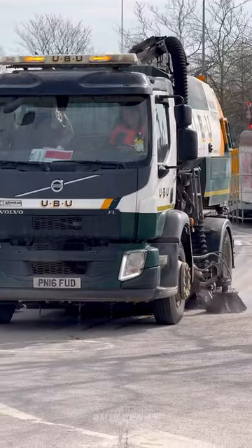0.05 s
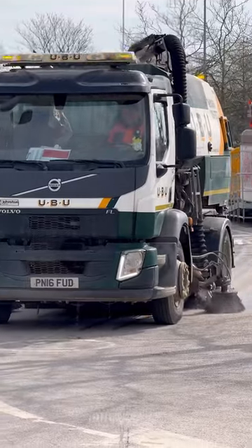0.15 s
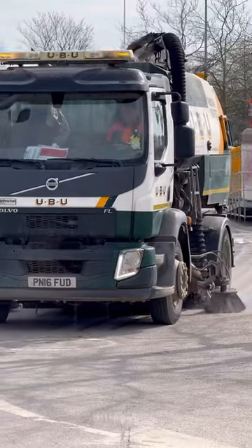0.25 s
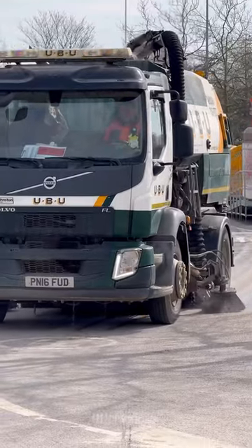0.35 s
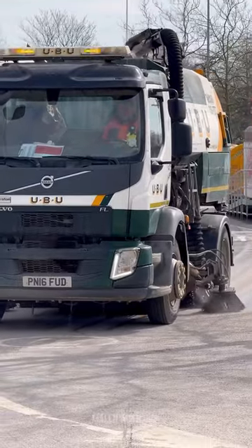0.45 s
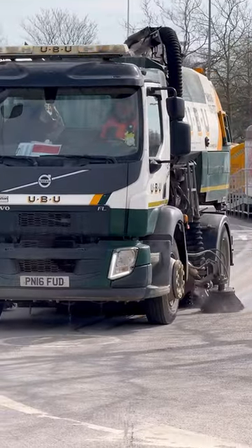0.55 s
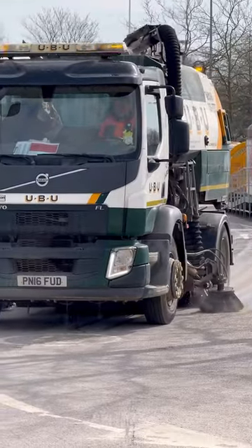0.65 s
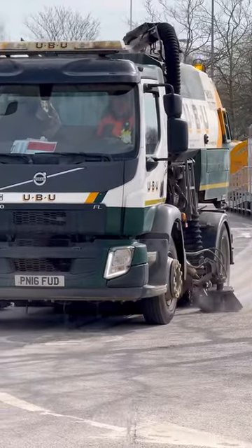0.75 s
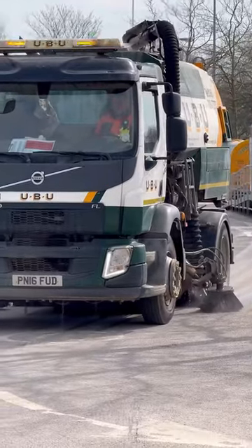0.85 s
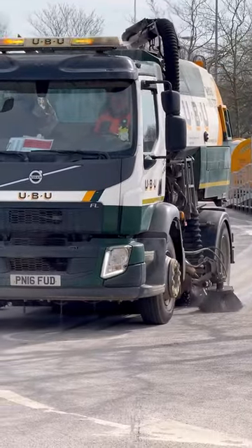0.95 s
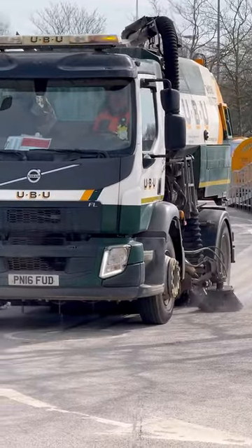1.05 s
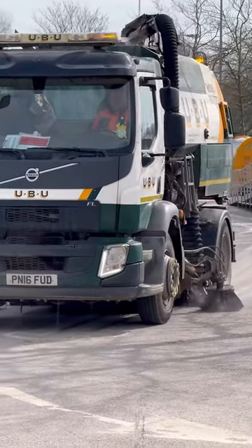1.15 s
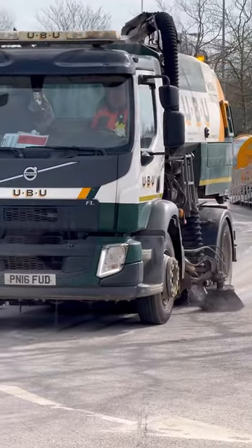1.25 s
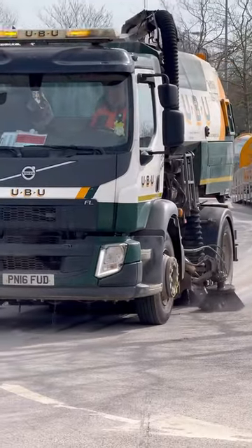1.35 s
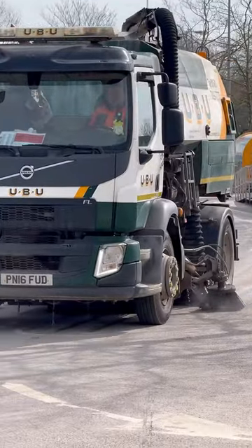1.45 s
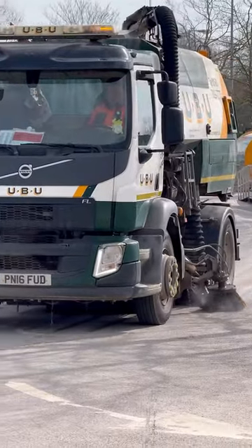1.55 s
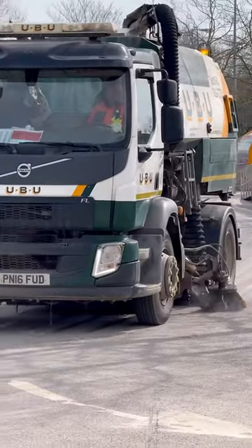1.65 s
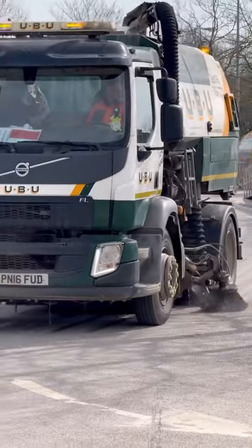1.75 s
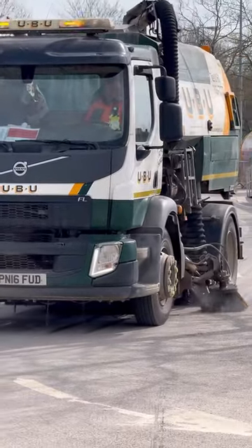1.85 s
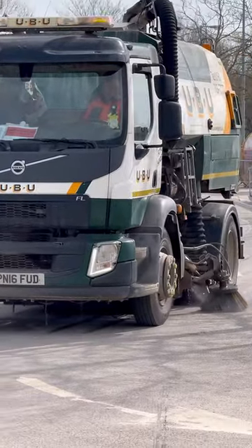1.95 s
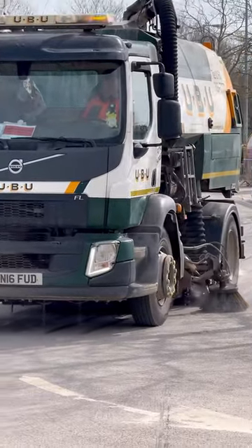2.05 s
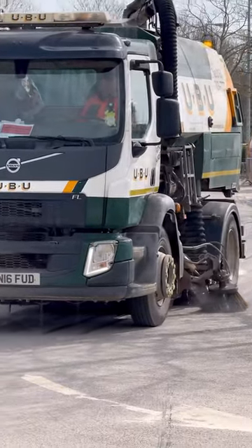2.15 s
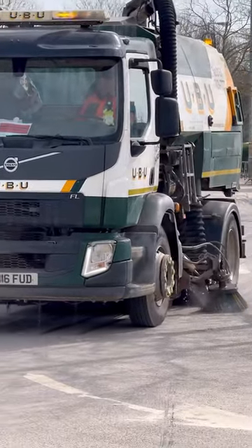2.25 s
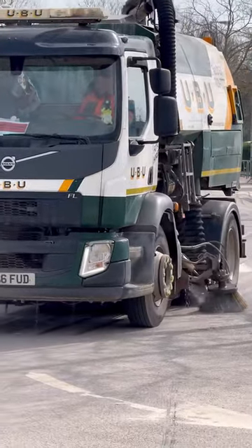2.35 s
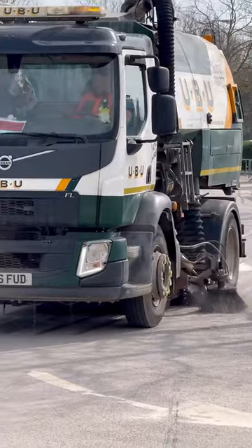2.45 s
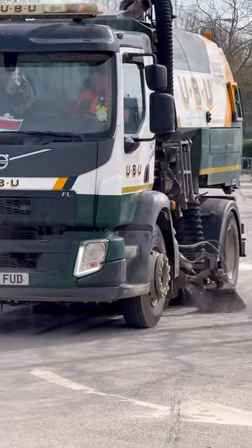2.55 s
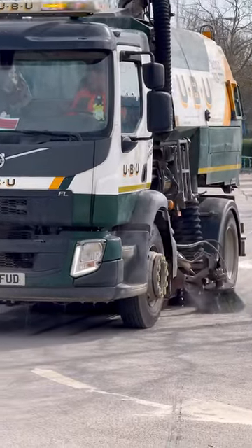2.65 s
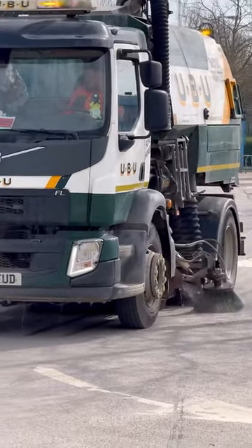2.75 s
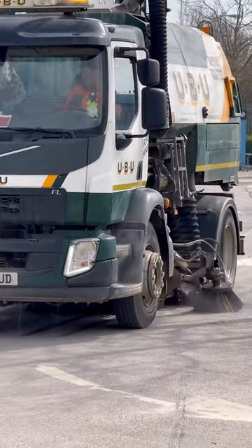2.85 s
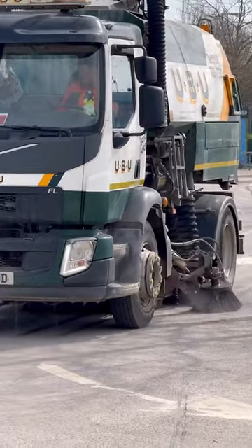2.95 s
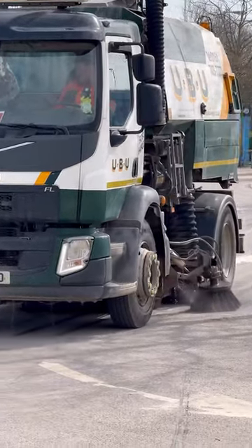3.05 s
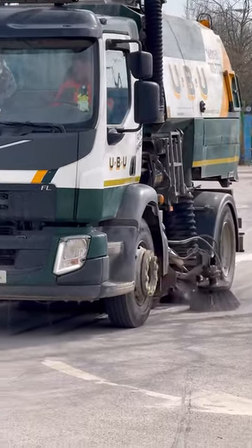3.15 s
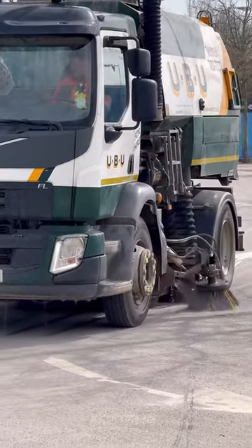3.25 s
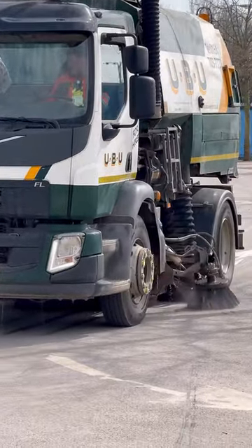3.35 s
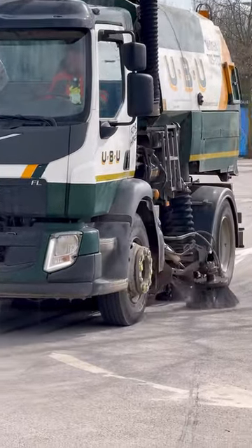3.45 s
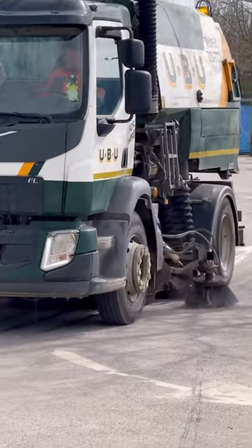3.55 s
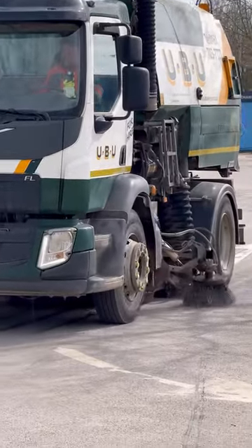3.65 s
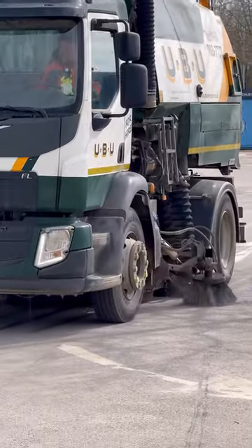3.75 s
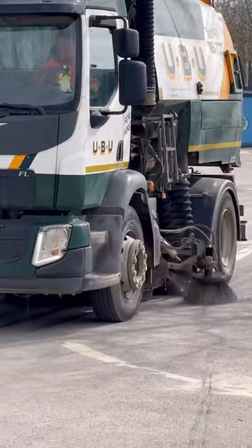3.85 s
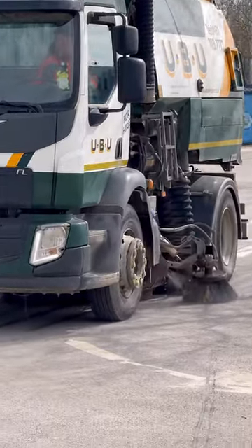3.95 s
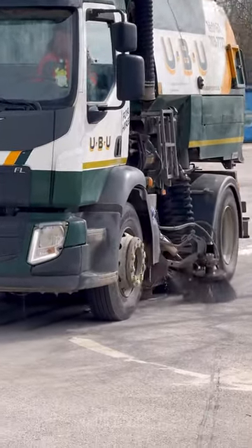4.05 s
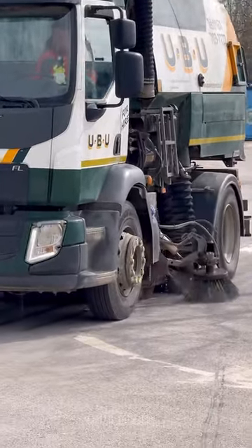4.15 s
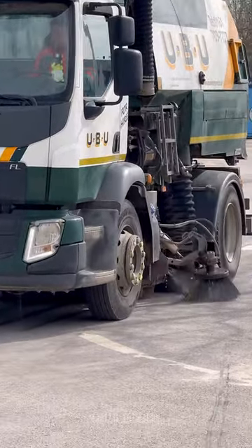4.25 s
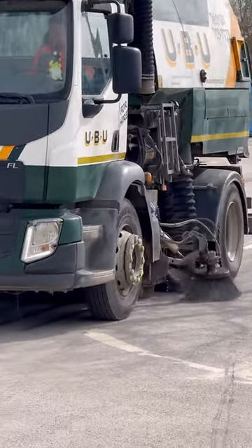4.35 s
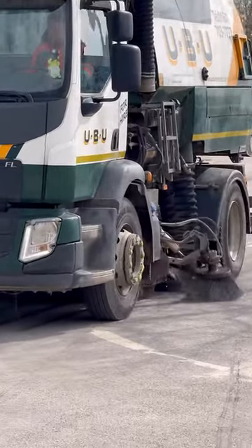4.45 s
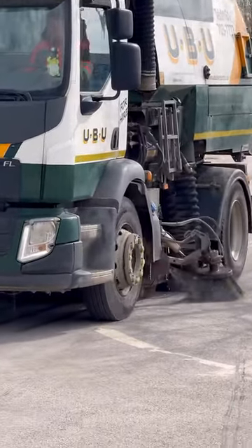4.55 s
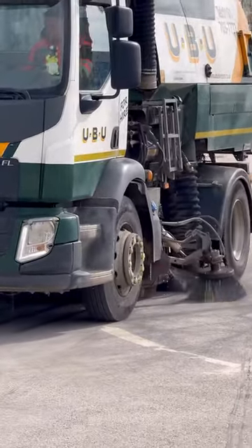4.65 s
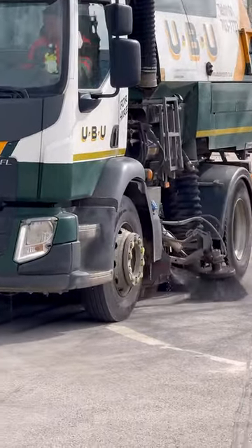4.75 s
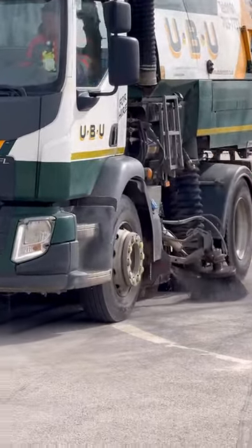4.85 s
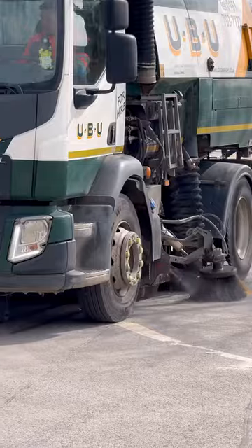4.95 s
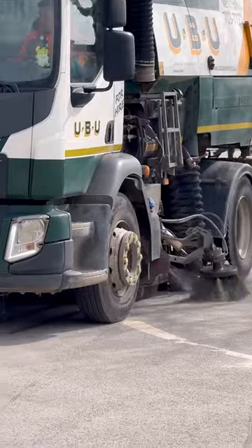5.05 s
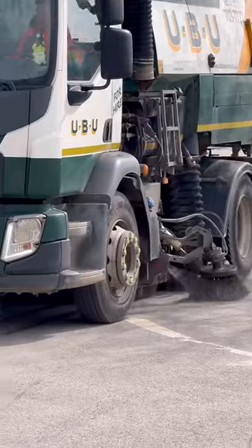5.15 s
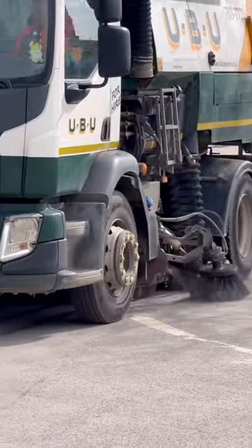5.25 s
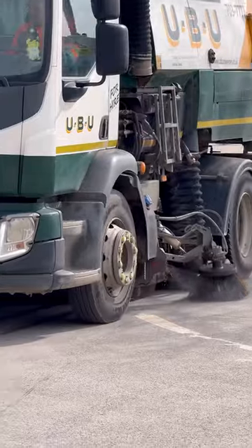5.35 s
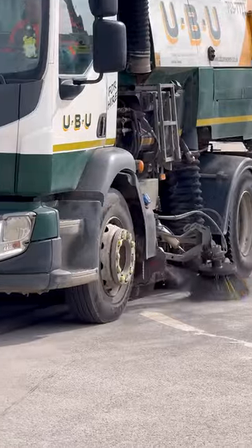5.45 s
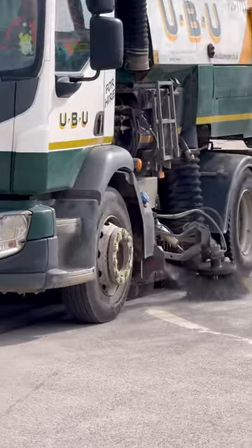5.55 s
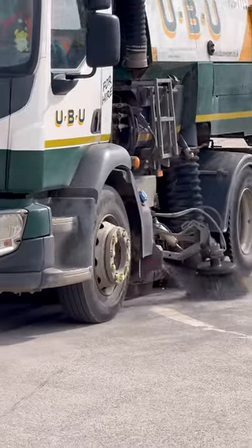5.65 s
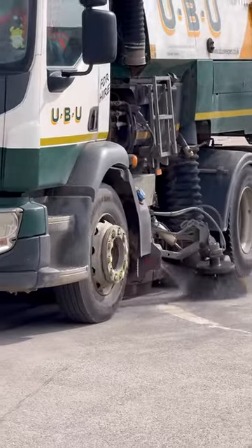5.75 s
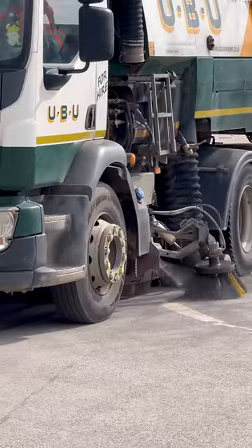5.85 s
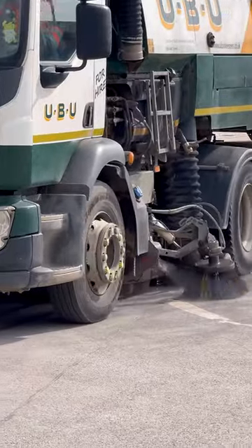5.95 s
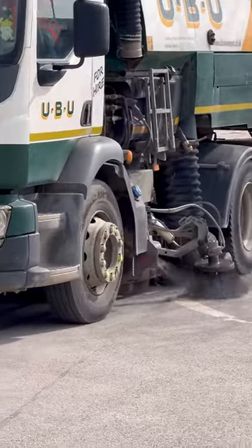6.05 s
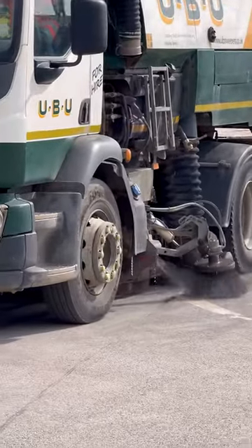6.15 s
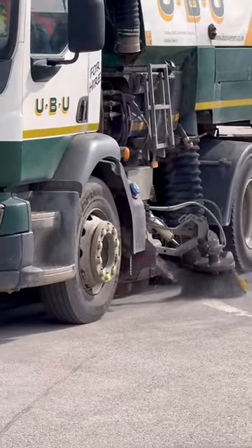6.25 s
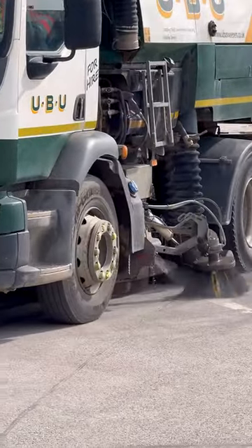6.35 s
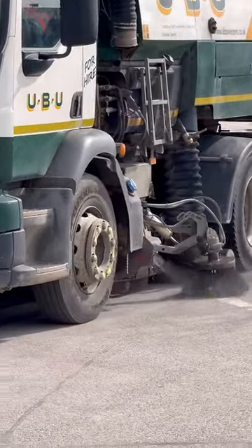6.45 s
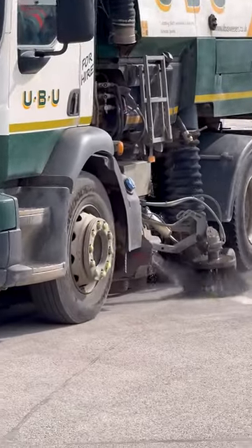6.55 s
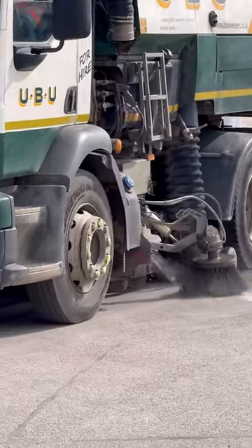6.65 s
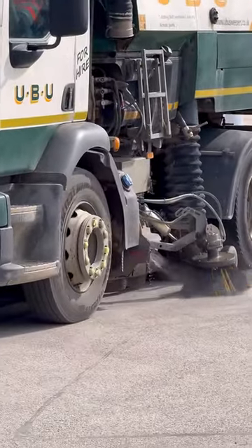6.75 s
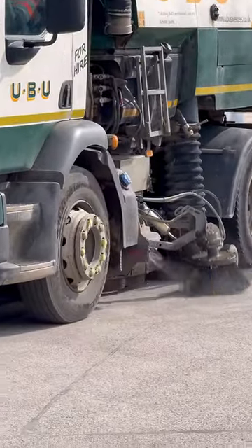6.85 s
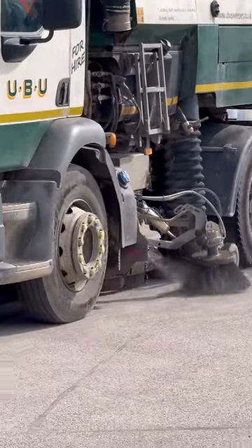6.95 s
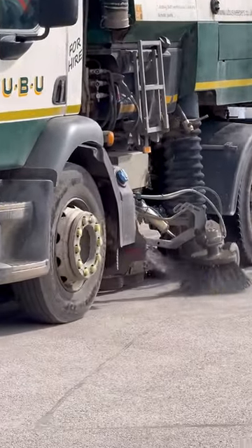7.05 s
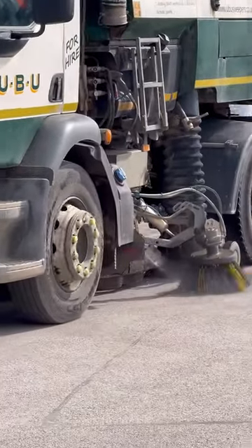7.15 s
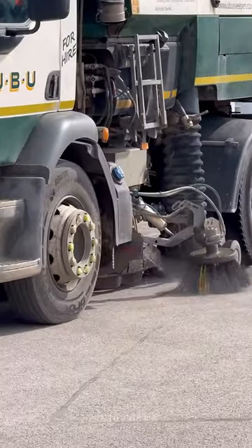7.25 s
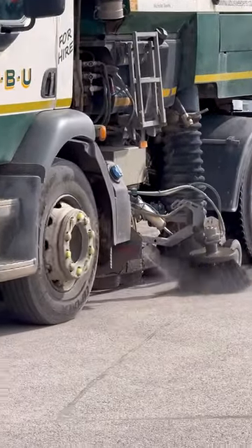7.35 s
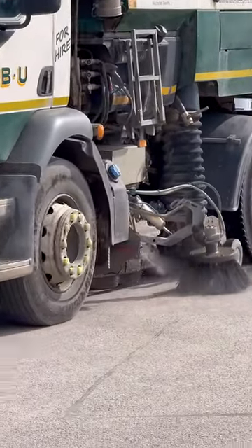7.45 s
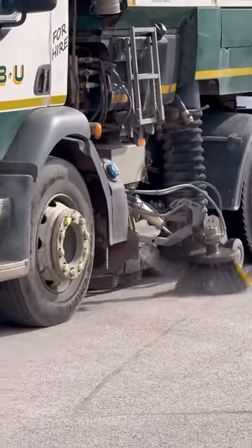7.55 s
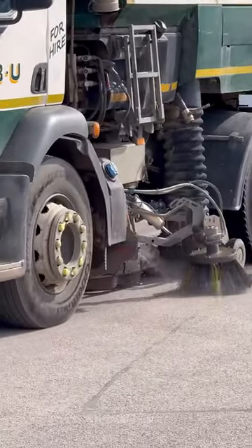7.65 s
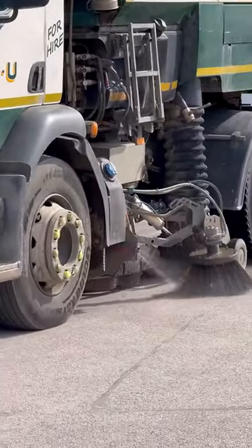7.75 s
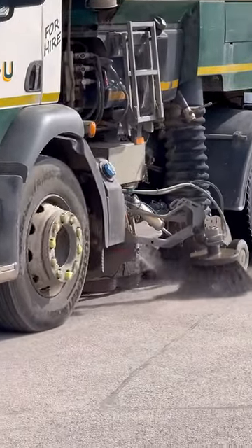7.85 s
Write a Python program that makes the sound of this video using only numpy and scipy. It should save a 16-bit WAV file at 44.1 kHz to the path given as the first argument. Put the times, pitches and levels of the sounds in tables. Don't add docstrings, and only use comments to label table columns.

```python
import sys
import numpy as np
from scipy import signal
from scipy.fft import rfft, irfft, next_fast_len
from scipy.io import wavfile
from scipy.ndimage import uniform_filter1d, map_coordinates

SR = 44100
rng = np.random.default_rng(int(sys.argv[2]) if len(sys.argv) > 2 else 0)


def convert_level_to_amplitude(level_db):
    exponent = np.asarray(level_db, float) / 20
    return 10 ** exponent


def store_wav(level_fs):
    pcm = np.round(np.clip(np.atleast_2d(level_fs), -1, 1) * 32767)
    wavfile.write(sys.argv[1], SR, pcm.T.astype(np.int16))


N = 347949
T_S = np.arange(N) / SR


def unit(x):
    return x / np.sqrt(np.mean(x ** 2) + 1e-20)


def along(points, hz):
    f, v = np.transpose(points)
    return np.interp(np.log(hz + 1), np.log(f + 1), v)


def curve(points):
    s, v = np.transpose(points)
    return np.interp(T_S, s, v)


def swells(rows):
    s = np.arange(0, N / SR + 1, 1 / 500)
    db = sum(db * np.exp(-((s - at_s) / half_s) ** 2) for at_s, db, half_s in rows)
    return np.interp(T_S, s, db)


def wobble(rate_hz):
    s = np.arange(0, N / SR + 1, 1 / 500)
    knots = rng.standard_normal(int(s[-1] * rate_hz) + 4)
    return np.interp(T_S, s, map_coordinates(knots, [s * rate_hz]))


def filtered(x, response):
    m = next_fast_len(N + 8192)
    return irfft(rfft(x, m) * response(np.fft.rfftfreq(m, 1 / SR)), m)[..., :N]


def rush(spectrum, patchy_db, grit=0):
    z = signal.stft(rng.standard_normal(N), nperseg=512)[2]
    field = uniform_filter1d(rng.standard_normal(z.shape), size=6, axis=0)
    field = uniform_filter1d(field, size=12, axis=1)
    patchy = signal.istft(z * convert_level_to_amplitude(patchy_db * unit(field)), nperseg=512)[1][:N]
    grains = rng.laplace(size=N) * (rng.random(N) < .02)

    def colour(hz):
        inside = (hz > spectrum[0][0]) & (hz < 16000)
        return convert_level_to_amplitude(along(spectrum, hz)) * inside

    return unit(filtered(unit(patchy) + grit * unit(grains), colour))


def tone(turns, db, sway_db, drift_rad):
    phase = 2 * np.pi * (turns + rng.random()) + drift_rad * wobble(2.995)
    return np.sqrt(2) * convert_level_to_amplitude(db + sway_db * wobble(4)) * np.sin(phase)


# t/s, level/dB
PASS = [(0.0, -34.5), (0.79, -35), (1.16, -37), (1.78, -34), (3.45, -32.5), (3.84, -31), (4.44, -32.5),
        (4.88, -31), (6.5, -31.5), (6.81, -32.5), (7.69, -29.5), (7.89, -31)]


def nearness():
    db = curve(PASS)
    return db - db.mean()


def exposed():
    return np.maximum(T_S - 5.82, 0)


# t/s, level/dB
FAN = [(0, -23), (.27, -21), (.7, -25), (1.05, -28), (1.45, -24), (1.85, -28.5), (2.15, -17.5),
       (2.45, -24.5), (2.85, -19), (3.35, -22), (4.6, -21), (5.0, -22), (5.25, -17), (6.0, -16),
       (6.25, -15), (6.5, -20.5), (6.85, -17), (7.65, -16.5), (7.89, -24)]
# t/s, level/dB, half width/s
FADES = [(1.2, -20, .04), (1.28, -8, .03), (1.68, -9, .04), (1.76, -3, .03), (2.55, -6, 0.031),
         (3.1, -13, 0.068), (3.86, -5, 0.032), (4.03, -6, .05), (4.38, -3.5, 0.11), (4.69, -2, 0.026),
         (5.55, -12, 0.065), (5.65, -6, 0.046), (6.35, -6.5, 0.078), (7.1, -13, 0.1), (7.42, -3.5, 0.061),
         (7.8, -9, 0.025)]
# t/s, level/dB, half width/s
GLINTS = [
    (6.43, 6, .09),
    (6.71, 5, 0.073),
    (6.87, -13, 0.055),
    (7.1, 2, .06),
    (7.22, -7, .03),
    (7.34, 4, .07),
    (7.66, -6, .04),
]


def fan_blades():
    blade_hz = 351.8 + 0.37 * wobble(4)
    turns = np.cumsum(blade_hz) / SR
    eddies_db = 1.16 * wobble(40)
    howl_db = curve(FAN) + swells(FADES) + eddies_db
    octave_db = -46 + 8.5 * exposed() + swells(GLINTS)
    howl = tone(turns, howl_db, sway_db=0.07, drift_rad=0.1)
    return howl + tone(2 * turns, octave_db, sway_db=1.2, drift_rad=0.24)


# t/s, level/dB, half width/s
THROBS = [(.42, 3, .05), (.62, 12, .06), (1.02, 10, .07), (1.43, 7, .08), (1.91, 7, .07), (2.42, 8, .07),
          (3.06, 4, .06), (3.32, 8, .05), (4.23, 10, 0.046), (4.6, 3, 0.26), (5.06, 13, .06),
          (5.65, 17, .06), (6.04, 4, .05), (6.57, 13, .08), (7.0, 1, .08), (7.37, 11, 0.13),
          (7.74, 10, .06)]
# f/Hz, level/dB per Hz
RUMBLE = [(18, -34), (28, -28), (38, -20), (48, -8), (62, 0), (81, 0), (120, -3.5), (150, -6.5),
          (200, -41.5)]
BODY = [(90, -38), (130, -3.5), (165, -1.5), (200, 0.5), (300, -7), (370, -2.5), (430, -5.5), (500, -4.5),
        (560, -6.5), (620, -15.5), (800, -37)]
ROAR = [(400, -24), (600, -1.5), (800, -1), (920, -3), (1200, -1), (1400, -4), (2000, -5.5), (2350, -9.5),
        (2800, -10.5), (3600, -47)]


def fan_air():
    near_db = nearness()
    rumble_db = -29 + 0.2 * near_db + 0.29 * swells(THROBS) + 1.2 * wobble(7)
    body_db = -27 + 0.52 * near_db + 0.75 * wobble(7)
    roar_db = -28 + 0.74 * near_db + 0.21 * wobble(8)
    rumble = convert_level_to_amplitude(rumble_db) * rush(RUMBLE, patchy_db=0.5)
    body = convert_level_to_amplitude(body_db) * rush(BODY, patchy_db=0.5)
    return rumble + body + convert_level_to_amplitude(roar_db) * rush(ROAR, patchy_db=0.39)


# order of its working cycle, level/dB
REAR = [(11, -44), (12, -43), (15, -39), (16, -42), (17, -47.5), (20, -42.5), (22, -44.5), (23, -44)]
# t/s, level/dB, half width/s
EIGHTHS = [(.4, 4, 0.23), (1.47, 6, .08), (1.95, 4, 0.32), (4.0, 7, 0.22), (4.75, 6, .2), (5.45, 7, 0.38),
           (6.31, 6, 0.062), (6.9, -1, .2), (7.65, 2, .2)]
FOURTHS = [(.18, 5, .08), (1.81, 8, .07), (2.5, 5, .2), (2.97, 10, .08), (3.42, 9, 0.17), (4.07, 14, .12),
           (4.8, 10, .12), (5.8, 10, .08), (6.7, 10, .3), (7.55, 7, .2)]
# order of its firing rate, level/dB
FRONT = [(3, -43.5), (4, -42), (11, -41.5), (28, -49.5)]
# f/Hz, level/dB
WHINES = [(43.9, -48), (92.9, -41), (109.9, -43), (414.9, -56.5), (1349, -57), (1670.5, -53.5),
          (2022.4, -50.5)]


def engines():
    cycles = 12.97 * T_S
    firings = 35.8 * T_S
    out = tone(8 * cycles, -35 + swells(EIGHTHS), sway_db=0.6, drift_rad=0.2)
    out += tone(4 * cycles, -40.5 + swells(FOURTHS), sway_db=0.6, drift_rad=0.2)
    out += sum(tone(k * cycles, db, sway_db=2.5, drift_rad=0.53) for k, db in REAR)
    out += sum(tone(k * firings, db, sway_db=0.0, drift_rad=0.72) for k, db in FRONT)
    out += tone(2.04 * firings, -38 + swells(THROBS), sway_db=1.5, drift_rad=0.8)
    return out + sum(tone(hz * T_S, db, sway_db=2.5, drift_rad=0.6) for hz, db in WHINES)


# t/s, level/dB, half width/s
LOADS = [(.95, 12, .12), (1.8, 10, .12), (2.7, 13, .2), (3.1, 8, .12), (3.55, 12, .15), (4.25, 12.5, .3),
         (4.8, 8, 0.17), (5.45, 13, .25), (6.2, 7, .25), (6.95, 8, .1)]


def pump():
    piston_hz, gear_hz = 328.9, 699.3
    pistons = tone(piston_hz * T_S, -41.5 + 1.8 * nearness(), sway_db=5.0, drift_rad=0.26)
    octave = tone(2 * piston_hz * T_S, -49.5 + swells(LOADS), sway_db=1.5, drift_rad=0.3)
    gear = tone(gear_hz * T_S, -44 + 1.0 * exposed(), sway_db=2.5, drift_rad=0.31)
    return pistons + octave + gear


# t/s, level/dB
GRIT = [(0.0, -44), (0.46, -48), (0.7, -46.5), (1.03, -49.5), (1.54, -45), (3.1, -41.5), (3.58, -43.5),
        (3.65, -41), (4.46, -45), (4.85, -42), (5.07, -43.5), (5.36, -40), (5.45, -43), (6.0, -41.5),
        (6.61, -45), (7.45, -42), (7.54, -41), (7.89, -41.5)]
# t/s, level/dB
NEAR = [(0, -0.5), (2, -2.5), (4, -1), (6, 1), (7.89, 0.5)]
# f/Hz, level/dB per Hz
SCRAPE = [(1800, -32), (2800, -0.5), (3600, -0.5), (4000, 0), (4300, -2.5), (5000, -1), (6200, -2.5),
          (7300, -10.5), (8500, -38)]
FIZZ = [(6000, -40), (7400, -8), (8100, -1), (9500, -1), (10700, 0), (11600, -2.5), (12600, -9),
        (14000, -40)]
SPARKLE = [(9000, -40), (10700, -6), (11600, -3), (12400, -2), (14000, 1), (15700, 2.3)]


def brush():
    bite = wobble(12)
    scrape_db = -32.5 + nearness() + 0.15 * bite
    fizz_db = 8 + curve(GRIT) + 0.44 * bite + 0.41 * wobble(5.05)
    scrape = convert_level_to_amplitude(scrape_db) * rush(SCRAPE, patchy_db=0.55, grit=0.17)
    fizz = rush(FIZZ, patchy_db=0.5, grit=0.18)
    fizz += convert_level_to_amplitude(curve(NEAR)) * rush(SPARKLE, patchy_db=0.0, grit=0.2)
    return scrape + convert_level_to_amplitude(fizz_db) * fizz


def yard(x):
    z = signal.stft(x, nperseg=1024)[2]
    scattered = z * np.exp(2j * np.pi * rng.random(z.shape))
    return 0.92 * signal.istft(scattered, nperseg=1024)[1][:, :N]


# t/s, f/Hz, half width/Hz, level/dB
PUFFS = [
    (.682, 12400, 700, -48),
    (2.492, 12000, 1400, -40),
    (3.742, 12500, 700, -42),
    (4.325, 11100, 600, -43),
    (5.253, 11100, 600, -43),
    (6.019, 10900, 400, -46),
    (7.329, 11600, 900, -39),
    (7.489, 12500, 800, -39),
]


def puffs():
    out, bell = np.zeros(N), np.hanning(1600)
    for s, hz, half_hz, db in PUFFS:
        band = signal.butter(4, [hz - half_hz, hz + half_hz], "band", fs=SR, output="sos")
        puff = unit(signal.sosfilt(band, rng.standard_normal(len(bell))))
        start = round(s * SR) - len(bell) // 2
        out[start:start + len(bell)] += convert_level_to_amplitude(db) * bell * puff
    return out


# f/Hz, phase/rad
LEAD = [(100, .005), (260, .08), (430, .11), (520, .29), (700, -.02), (1500, -.02), (4000, -.1),
        (5500, -.46), (7300, -1.36), (9000, -2.1), (10300, -2.55), (12100, -3.14), (13500, -3.65),
        (15700, -4.65)]
# f/Hz, level/dB
LEAN = [(200, 0), (400, 0), (600, 4.5), (800, 1.6), (1200, 0.1), (3000, -0.5)]
# f/Hz, level/dB
APART = [(120, -50), (200, -40), (430, -21), (600, -13), (900, -27), (1300, -19.5), (2500, -25.5),
         (4300, -21), (5500, -10), (7300, -4), (9700, -4), (10700, -31), (13200, -20), (13950, 0.5)]


def scene():
    truck = fan_blades() + fan_air() + engines() + pump() + brush()
    truck = np.array([1, 1])[:, None] * truck
    side = np.array([[0.5], [-0.5]])

    def share(hz):
        return 1 / np.sqrt(1 + convert_level_to_amplitude(2 * along(APART, hz)))

    def direct(hz):
        return share(hz) * convert_level_to_amplitude(side * along(LEAN, hz)) * np.exp(1j * side * along(LEAD, hz))

    def scattered(hz):
        return share(hz) * convert_level_to_amplitude(along(APART, hz))

    return filtered(truck, direct) + filtered(yard(truck), scattered) + puffs()


def top_cut(x):
    return signal.sosfilt(signal.butter(12, 16000, fs=SR, output="sos"), x)


def record(dry):
    mix = filtered(dry, lambda hz: hz < 15750)
    return top_cut(mix)


dry = scene()
out = record(dry)
store_wav(out)
```